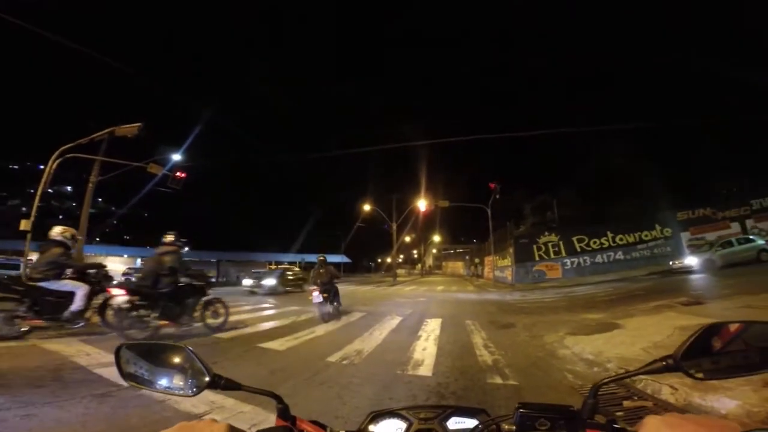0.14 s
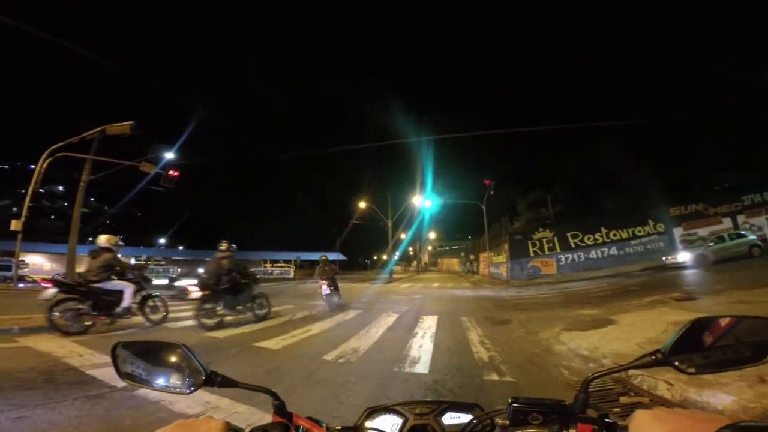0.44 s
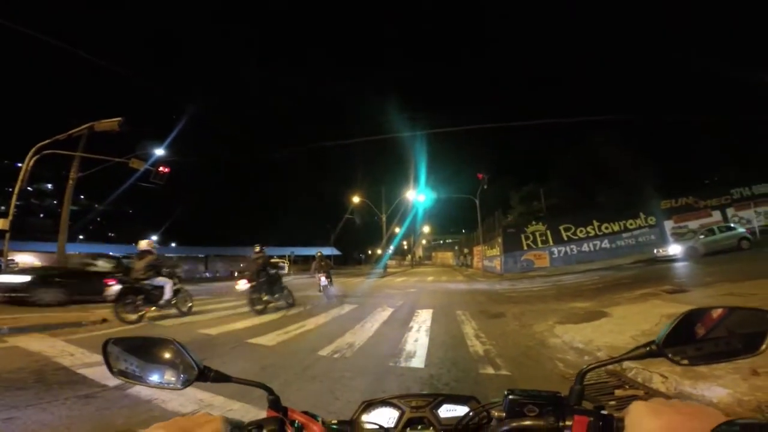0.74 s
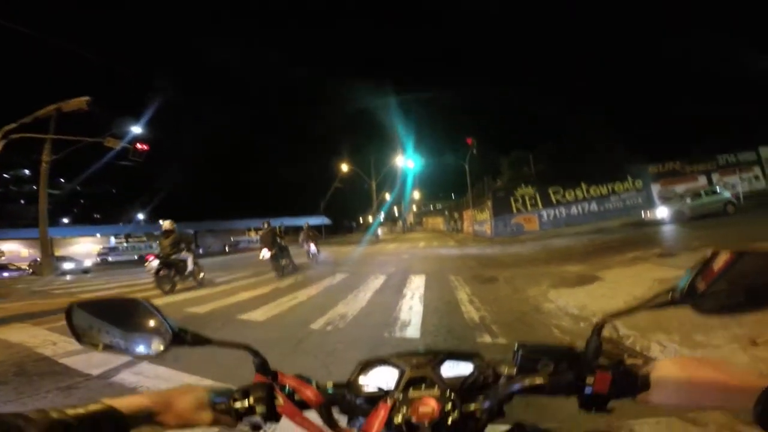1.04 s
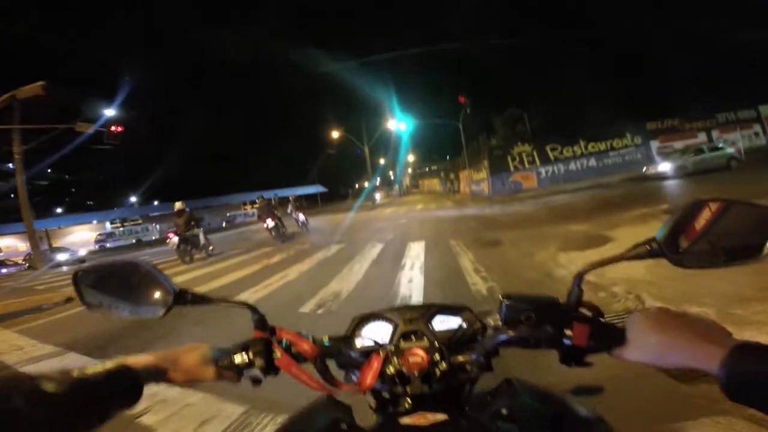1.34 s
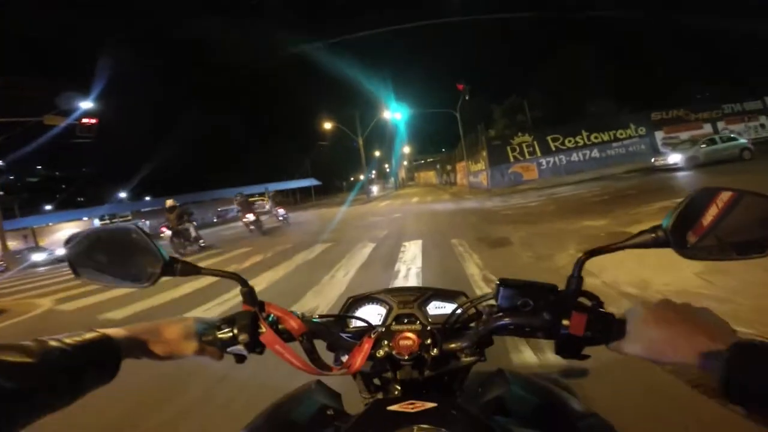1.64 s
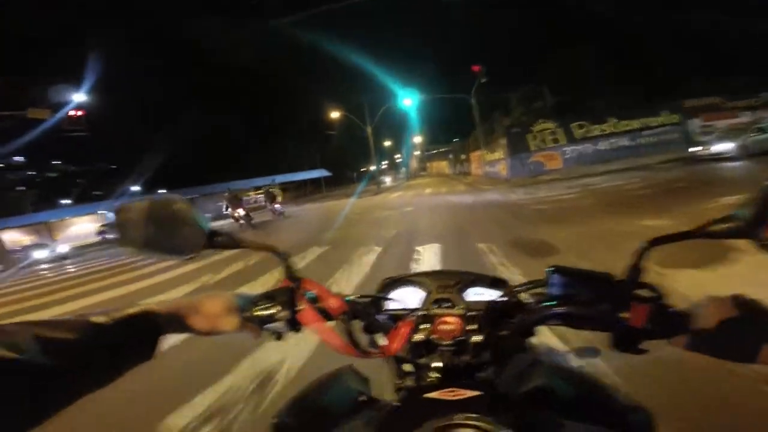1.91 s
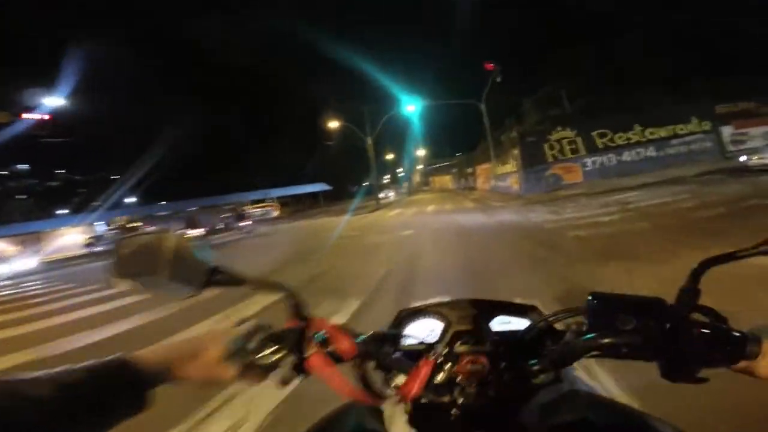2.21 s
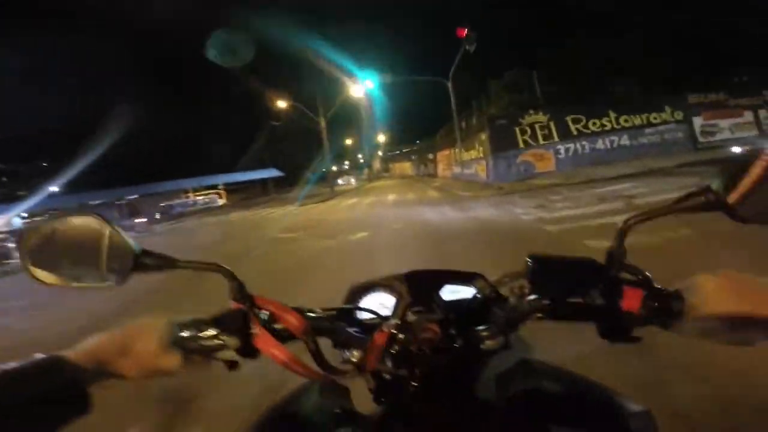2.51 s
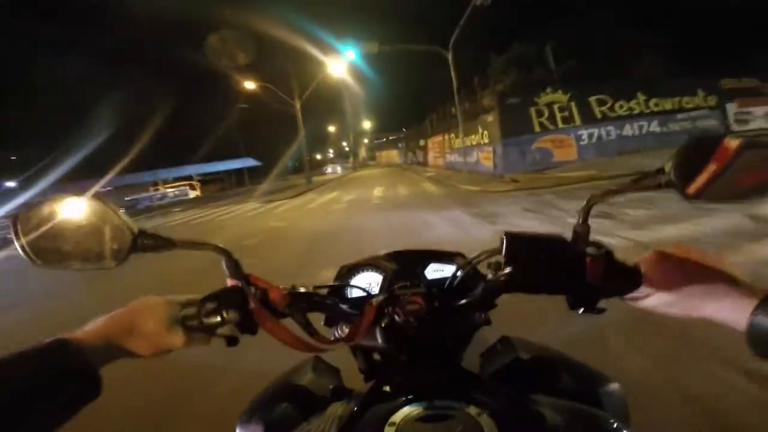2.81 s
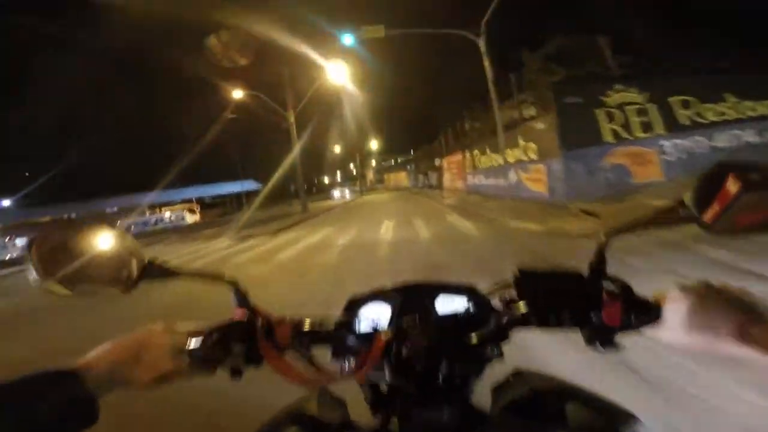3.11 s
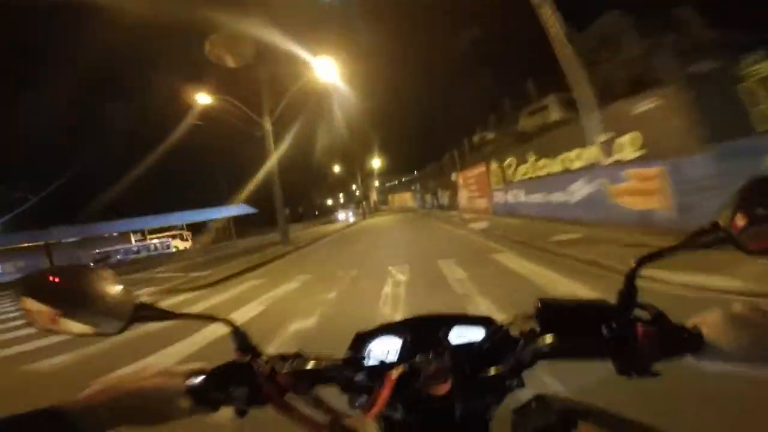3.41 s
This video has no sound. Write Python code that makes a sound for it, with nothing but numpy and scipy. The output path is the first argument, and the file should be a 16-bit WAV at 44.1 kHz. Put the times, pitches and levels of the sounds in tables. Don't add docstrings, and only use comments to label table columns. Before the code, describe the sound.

A four-cylinder motorcycle engine idles with a low smooth hum until 0.75 s, while two single-cylinder bikes beside it thump, spit hiss and ring metallically. It blips to 0.95 s, then wavers as the clutch slips. The neighbours mostly fade by 1.7 s, returning faintly around 2.3 s. From 2.1 s the engine climbs steadily, louder and more barking, until 3.55 s. Soft traffic wash and short street echoes; close saddle microphone.

```python
import sys
import numpy as np
from scipy import signal
from scipy.fft import rfft, irfft
from scipy.io import wavfile
from scipy.ndimage import uniform_filter1d

SR = 44100
rng = np.random.default_rng(int(sys.argv[2]) if len(sys.argv) > 2 else 0)


def put_to_file(sound):
    columns = np.atleast_2d(sound).T
    safe = np.clip(columns, -1, 1)
    whole_steps = np.round(safe * 32767)
    wavfile.write(sys.argv[1], SR, whole_steps.astype(np.int16))


def how_loud(loudness_db):
    steps = np.asarray(loudness_db, float) / 20
    return 10 ** steps


N = 156555
T = np.arange(N) / SR
HZ = np.fft.rfftfreq(N, 1 / SR)


def column(table, order):
    rows = np.array(table, float)
    return np.interp(T, rows[:, 0], rows[:, order])


def colour(x, points, fall_db=-30, turn=0.):
    f, db = np.transpose(points)
    octave = np.log2(HZ + 1)
    above_top = np.maximum(octave - np.log2(f[-1]), 0)
    shape_db = np.interp(octave, np.log2(f), db) + fall_db * above_top
    rumble_cut = (HZ / (HZ + 12)) ** 2
    return irfft(rfft(x) * how_loud(shape_db) * rumble_cut * np.exp(-1j * turn), N)


def evened(x):
    return x / np.sqrt(np.mean(x ** 2) + 1e-20)


def smooth_noise(shape, size, axes):
    return evened(uniform_filter1d(uniform_filter1d(rng.standard_normal(shape), size, axes[0]), size, axes[1]))


def firings(rate, start):
    turns = start + np.cumsum(rate) / SR
    at = np.flatnonzero(np.diff(np.floor(turns))) + 1
    return at, (turns[at] % 1) * SR / rate[at]


def train(at, part, size):
    out = np.zeros(N)
    out[at - 1], out[at] = size * part, size * (1 - part)
    return out


def ring(x, hz, width):
    return signal.lfilter(*signal.iirpeak(hz, hz / width, SR), x)


def four():
    # (time [s], rate [firings/s])
    crank_speed = [(0, 51.69), (.77, 52.1), (.86, 86.87), (.95, 91.15), (1.08, 83.44), (1.33, 76.46),
                   (1.8, 87.17), (2.0, 83.75), (2.11, 78.37), (2.3, 96.99), (2.5, 109.93), (2.65, 126.96),
                   (2.84, 135.65), (2.95, 148.83), (3.2, 166.66), (3.35, 179.11), (3.55, 194.89)]
    # (time [s], boom [dB], bark [dB], one-cylinder lead [dB], roar [dB])
    ride = [(0, -18.5, -35, -11, -43.5), (.7, -17, -26.5, 12, -25), (.85, -21.5, -21, -7, -36.5),
            (1.1, -15, -17.5, 0, -28.5), (1.4, -16.5, -17.5, 0, -35.5), (1.8, -16, -17, 5, -28.5),
            (2.1, -15, -18.5, 0, -33), (2.35, -14, -14, 0, -29.5), (2.6, -12.5, -14, 13, -24.5),
            (2.8, -9.5, -9.5, 4, -20), (3.0, -14, -8, -2, -24), (3.3, -10.5, -7, 2, -25.5),
            (3.55, -11, -3, -1.5, -23)]
    cylinders = [0.0007, -0.44, 0.2, -0.027]
    # (frequency [Hz], level [dB])
    pipe = [(165, 4.5), (260, -8), (345, -26), (430, -6), (600, -13.5), (800, -26), (960, -41), (1450, -37)]
    # (frequency [Hz], level [dB])
    roar_tone = [(60, -30), (200, -5.5), (600, 6), (950, -6), (1500, -19.5), (2600, -24), (5000, -39),
                 (15000, -79)]
    # (frequency [Hz], width [Hz], level [dB])
    casing_rings = [(1113, 160, -14.5), (1350, 270, -17.5), (3290, 260, -29.5), (4400, 100, -48)]
    start, hunt_turns = .1, .022
    uneven_db, drift_db, puff_db = 1.3, .8, 1.5
    puff_s, boom_delay_s = .002, .0013

    hunt = smooth_noise(N, 2500, (0, 0))
    rate = column(crank_speed, 1) + hunt_turns * SR * np.gradient(hunt)
    at, part = firings(rate, start)
    odd = rng.standard_normal((len(at), 3))
    angle = 2 * np.pi * (start + np.cumsum(rate) / SR)

    lead_db = column(ride, 3)[at] * np.resize(cylinders, len(at))
    size = how_loud(uneven_db * odd[:, 0] + lead_db)
    pulses = train(at, part, size * SR / rate[at]) - 1 - 2 * np.cos(angle)
    bark = colour(pulses / np.sqrt(2), [(40, -22)] + pipe, fall_db=-28, turn=1.63)
    bark = bark * how_loud(column(ride, 2))

    boom_db = column(ride, 1) + drift_db * np.interp(np.arange(N), at, odd[:, 2])
    boom = np.sqrt(2) * np.cos(angle - .3 - 2 * np.pi * rate * boom_delay_s) * how_loud(boom_db)

    puff_clicks = train(at, part, size * how_loud(puff_db * odd[:, 1]))
    puff = signal.lfilter([1], [1, -np.exp(-1 / (puff_s * SR))], puff_clicks)
    air = (.35 + puff) * rng.standard_normal(N)
    casing = sum(ring(air, hz, width) * how_loud(db) for hz, width, db in casing_rings)
    roar = evened(colour(air, roar_tone) + casing) * how_loud(column(ride, 4))
    return boom + bark + roar


def spit(at, part, gate, shot_db):
    # (frequency [Hz], level [dB])
    hiss_tone = [(700, -6.5), (1800, -1), (2600, -6.5), (5000, -2), (7000, -8.5), (9200, -4), (11500, -13),
                 (15500, -19.5)]
    # (time [s], loss per band below the top [dB])
    turn_away = [
        (0, -0.5),
        (.8, -0.5),
        (1.1, 3.5),
        (1.6, 13),
        (2.3, 6),
        (3.55, 3),
    ]
    colour_db = 3.5
    air = colour(rng.standard_normal(N), hiss_tone)
    lost_db = column(turn_away, 1)[at]
    shot = shot_db * rng.standard_normal(len(at))
    edges = np.geomspace(700, 16500, 7)
    hiss = np.zeros(N)
    for k in range(6):
        band = irfft(rfft(air) * (HZ >= edges[k]) * (HZ < edges[k + 1]), N)
        band_db = shot + colour_db * rng.standard_normal(len(at)) - lost_db * max(4 - k, 0)
        hiss += signal.oaconvolve(train(at, part, how_loud(band_db)), gate)[:N] * band
    return hiss / air.std()


def single(speed, start, effort, shield_hz, shield_width_hz):
    # (frequency [Hz], level [dB])
    thump_tone = [(25, -34), (60, 8), (130, 2), (250, 6.5), (450, -2.5), (800, -37.5), (1500, -32),
                  (4000, -46)]
    shot_db, shake_db, spit_s = 1.5, .83, .0021
    at, part = firings(column(speed, 1), start)
    odd = rng.standard_normal((len(at), 2))
    thump = colour(train(at + 40, part, how_loud(shot_db * odd[:, 0])), thump_tone, turn=0.41)

    t = T[:3000]
    gate = (t / spit_s * np.exp(1 - t / spit_s)) ** 2.7
    hiss = spit(at, part, gate, shot_db)

    shake = signal.oaconvolve(train(at, part, how_loud(shake_db * odd[:, 1])), gate)[:N]
    shake = shake * rng.standard_normal(N)
    rung = ring(ring(shake, shield_hz, shield_width_hz), shield_hz, 3 * shield_width_hz)
    return (40 * thump * how_loud(column(effort, 1)) + hiss * how_loud(column(effort, 2))
            + 3 * evened(rung) * how_loud(column(effort, 3) - 24))


def first_neighbour():
    # (time [s], rate [firings/s])
    speed_curve = [(0, 34.2), (.3, 32.29), (.9, 30.78), (1.1, 31.84), (1.45, 33.89), (1.8, 29.28),
                   (1.9, 24.75), (2.1, 24.38), (2.25, 28.41), (2.55, 30.51), (2.95, 28.85), (3.55, 32.16)]
    # (time [s], thump [dB], spit [dB], ring [dB])
    effort_curve = [(0, -3, -32, -26.5), (.4, -3.5, -33.5, -30), (.75, -3, -32, -50), (1.1, -8, -47, -42),
                    (1.45, -9, -36, -40), (1.65, -32, -52, -61), (2.0, -39, -62, -55),
                    (2.3, -10.5, -33, -55), (2.55, -17, -33, -65), (2.85, -17, -39.5, -35),
                    (3.55, -31, -44.5, -33.5)]
    return single(speed_curve, .634, effort_curve, shield_hz=2146, shield_width_hz=140)


def second_neighbour():
    # (time [s], rate [firings/s])
    speed_curve = [(0, 26.63), (.2, 28.44), (.33, 27.7), (.55, 32.06), (.85, 35.15), (1.2, 36.7),
                   (1.37, 34.51), (1.6, 26.59), (1.7, 26.75), (1.82, 24.37), (2.3, 25.85), (2.55, 28.41),
                   (2.8, 28.68), (3.55, 27)]
    # (time [s], thump [dB], spit [dB], ring [dB])
    effort_curve = [(0, -9.5, -22, -24.5), (.4, -17, -26, -43), (.8, -8, -29.5, -38),
                    (1.2, -17.5, -31, -35), (1.5, -23, -37, -24), (1.6, -38, -40, -25),
                    (1.66, -31, -51, -41), (1.8, -38, -38.5, -24), (2.3, -22, -29.5, -27.5),
                    (2.55, -38, -57, -27), (2.7, -22, -42, -44), (3.55, -29, -58, -40)]
    return single(speed_curve, .491, effort_curve, shield_hz=3696, shield_width_hz=240)


def walls(x):
    echo_t60, first_echo_s = .032, .004
    t = T[:9000]
    sparse = rng.standard_normal(9000) * (rng.random(9000) < .02)
    taps = sparse * how_loud(-60 * t / echo_t60) * (t > first_echo_s)
    return signal.oaconvolve(x, taps / np.linalg.norm(taps))[:N]


def street():
    # (frequency [Hz], level [dB])
    wash_tone = [(20, -23), (45, 0), (250, -2), (700, -13.5), (1500, -24), (2700, -31.5), (8500, -38),
                 (15000, -58)]
    # (time [s], wash [dB], brightness [dB])
    traffic = [
        (0, -19, 0),
        (.7, -24.5, 3.5),
        (1.1, -24, 1),
        (1.45, -24, 0),
        (1.65, -29.5, -5),
        (2.2, -23.5, -6.5),
        (2.8, -22.5, -7),
        (3.55, -28, 2.5),
    ]
    hz, t, z = signal.stft(colour(rng.standard_normal(N), wash_tone), SR, nperseg=512)
    patches = smooth_noise(z.T.shape, 6, (0, 1)).T
    treble = np.clip(np.log2(hz / 1200 + 1e-9), 0, 1)[:, None]
    bright_db = np.interp(t, T, column(traffic, 2)) * treble
    wash = signal.istft(z * how_loud(2.0 * patches + bright_db), SR, nperseg=512)[1][:N]
    usual = np.sqrt(2 * np.sum(abs(z) ** 2) / len(t))
    return wash / usual * how_loud(column(traffic, 1))


def scene():
    # (frequency [Hz], level [dB])
    side_tone = [(30, -32), (150, -34), (700, -40), (2500, -24.5), (8000, -32.5), (15000, -20)]
    echo_db = -7
    others = first_neighbour() + second_neighbour()
    mid = four() + others + how_loud(echo_db) * walls(others) + street()
    side = colour(signal.windows.tukey(N, .02) * walls(mid), side_tone)
    return mid + np.outer([1, -1], side)


def roll_off(x):
    return signal.sosfilt(signal.butter(12, 15850, fs=SR, output="sos"), x)


def record(dry):
    limited = 1.141 * np.tanh(dry / 1.452)
    edge = signal.firwin(401, 15800, window=("kaiser", 8), fs=SR)
    padded = np.pad(limited, ((0, 0), (len(edge) // 2,) * 2), "reflect")
    return roll_off(signal.oaconvolve(padded, edge[None], "valid"))


dry = scene()
out = record(dry)
put_to_file(out)
```